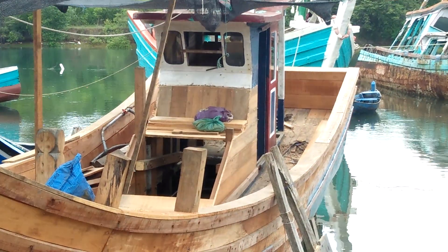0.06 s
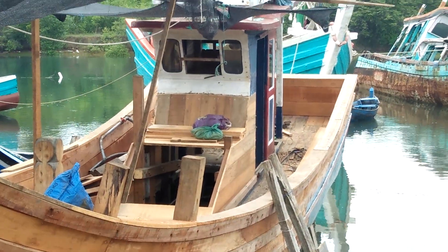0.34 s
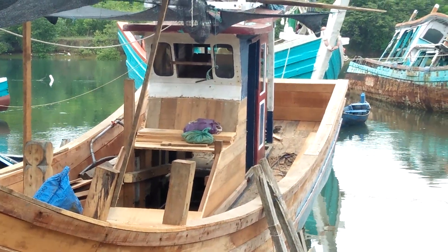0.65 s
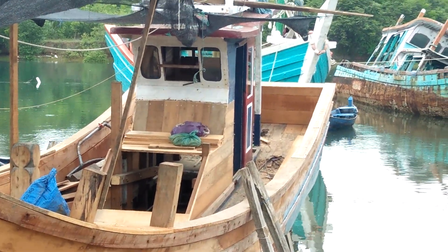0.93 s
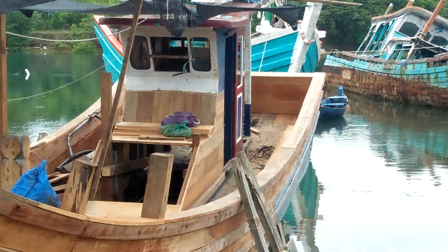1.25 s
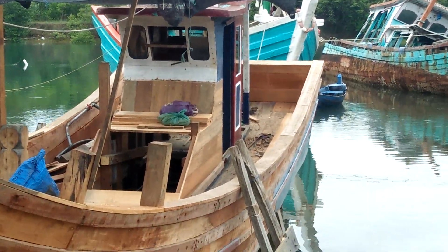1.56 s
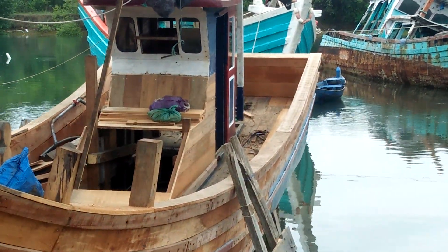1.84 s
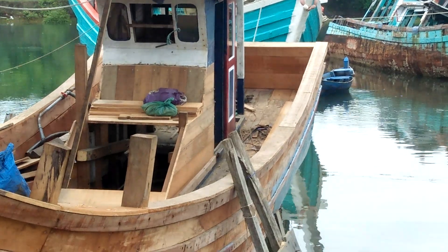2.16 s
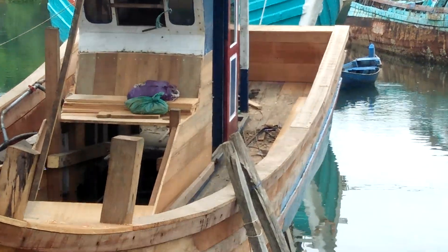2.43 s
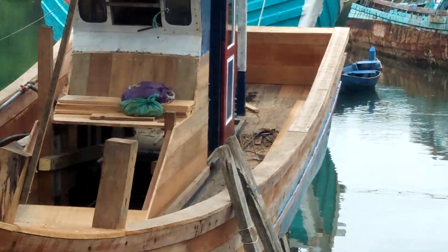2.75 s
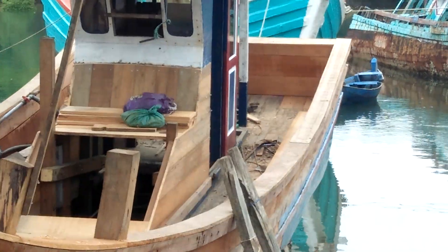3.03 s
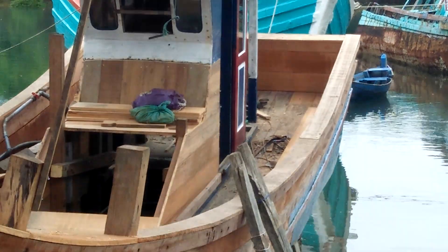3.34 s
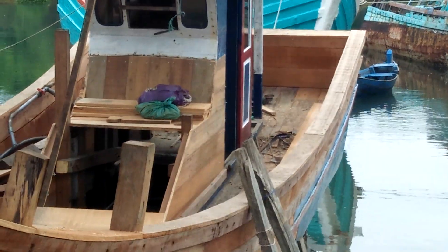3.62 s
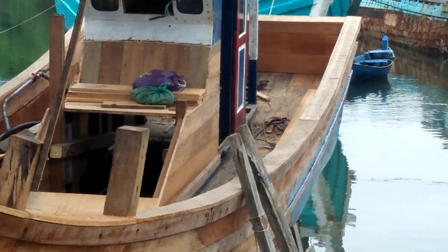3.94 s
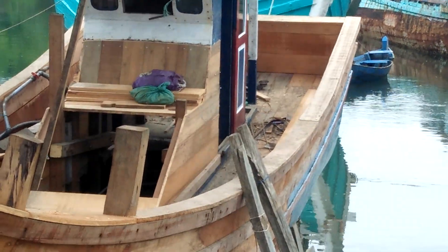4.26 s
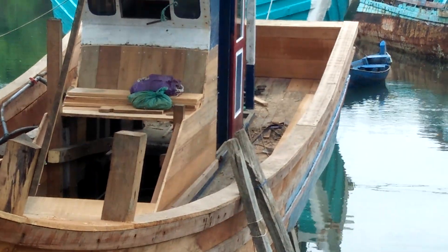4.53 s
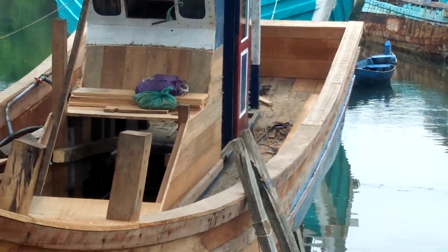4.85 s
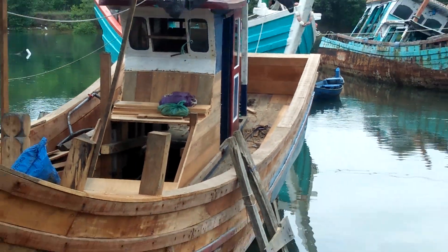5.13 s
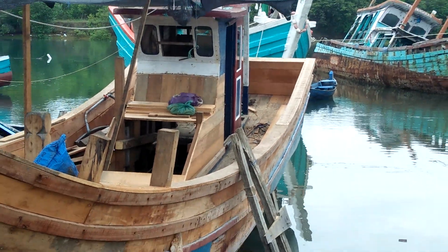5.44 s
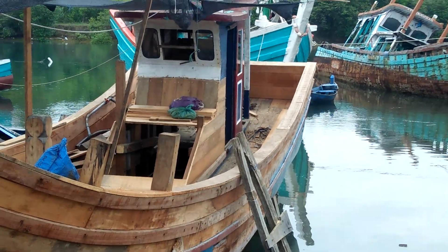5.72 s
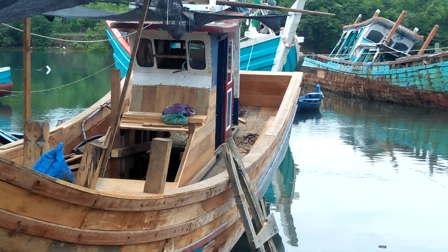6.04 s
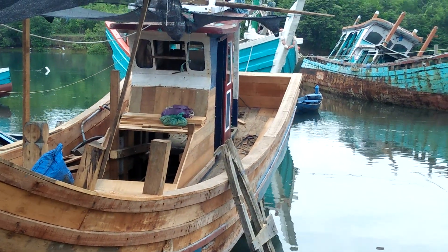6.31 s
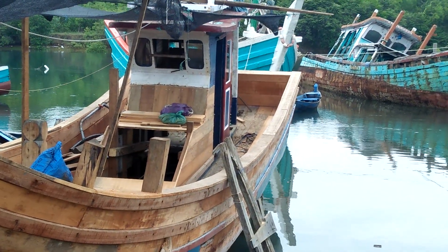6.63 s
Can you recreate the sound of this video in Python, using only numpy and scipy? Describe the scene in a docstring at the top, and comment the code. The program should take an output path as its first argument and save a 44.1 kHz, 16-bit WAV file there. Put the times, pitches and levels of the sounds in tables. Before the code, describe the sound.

Across the water of a harbour, a diesel boat engine throbs rapidly over a fainter idling one and a distant rumble. Right by the microphone come a dull, dry double knock and then a small click, the sharpest sounds heard. Afterwards the engine picks up for a moment and eases back, while water sloshes, splashes and gurgles among the moored boats under a light hiss.

```python
"""A single-cylinder boat diesel thuds across the harbour, speeding up briefly, over a second one idling.
Each firing sends a pulse and a puff of gas down the exhaust pipe. Water washes between the moored
hulls in rough swells, trapped air gurgles, and spray lays a fine hiss on top.
Close to the microphone come one dull double knock and a small sharp click."""
import sys
import numpy as np
from scipy import signal
from scipy.fft import rfft, irfft, next_fast_len
from scipy.io import wavfile
from scipy.ndimage import uniform_filter1d, map_coordinates

SR = 44100
rng = np.random.default_rng(int(sys.argv[2]) if len(sys.argv) > 2 else 0)


def generate_wav(signal):
    """Clip the signal to [-1, 1] and save it as 16-bit WAV at the path in sys.argv[1]."""
    frames = np.transpose(np.atleast_2d(signal))
    scaled = np.clip(frames, -1, 1) * 32767
    pcm = np.round(scaled).astype(np.int16)
    wavfile.write(sys.argv[1], SR, pcm)


N = 303496
T = np.arange(N) / SR
SLOW_T = np.arange(0, N, 100) / SR  # coarse clock for the swells

# The running diesel, across the water.
ENGINE_SPEED = [(0, 32.3), (.25, 32.1), (.5, 31.4), (.8, 30), (1, 29.55), (1.3, 29.35), (1.6, 30.2),
                (2, 32.4), (2.45, 34.1), (2.9, 31.9), (3.3, 31.4), (4, 30.7), (4.5, 30.3), (5, 30.05),
                (6, 29.9), (6.88, 29.4)]  # time_s, firings_per_s
EXHAUST_LEVELS = [(0, -49.5, -55.5), (.5, -49, -57), (.88, -45.5, -61.5), (1.3, -49.5, -78),
                  (1.42, -55.5, -66), (2.8, -56, -63), (2.98, -49, -65), (3.2, -51.5, -58),
                  (3.5, -53.5, -50), (3.88, -46.5, -48), (4.4, -47, -57), (4.6, -52, -69),
                  (4.8, -52.5, -62), (5.2, -54.5, -68), (5.6, -54, -62.5), (6.4, -73, -60),
                  (6.88, -55.5, -65)]  # time_s, thud_db, bark_db
BOOM_LEVELS = [(0, -45.5, -51), (.13, -41.5, -57), (.43, -48, -52), (.85, -54, -77), (1.3, -69, -79.5),
               (1.76, -46.5, -54), (2, -59, -74), (2.6, -63, -65), (3.05, -49, -58), (3.6, -45.5, -54.5),
               (4.4, -53.5, -61.5), (6.5, -55, -53), (6.88, -57, -59)]  # low exhaust tones: time_s, second_order_db, third_order_db
DRONE_LEVELS = [(0, -67.5), (1.3, -65.5), (1.7, -63), (2.8, -83), (3.25, -70.5), (3.6, -56.5), (4, -55),
                (4.55, -63), (4.78, -57), (5, -70.5), (6.88, -62.5)]  # the pipe's upper resonance: time_s, level_db
# Exhaust resonances, low to high: frequency_hz, gain_db
THUD_SPECTRUM = [(60, -56), (92, -8.5), (122, -5), (155, 6), (185, 4.5), (220, -3.5), (300, -34),
                 (400, -58), (1500, -110)]
BARK_SPECTRUM = [(150, -51.5), (240, -6.5), (295, 3), (335, 0), (400, -12.5), (530, -30), (760, -44),
                 (1200, -57), (4000, -100)]
DRONE_SPECTRUM = [(330, -49), (420, -4.5), (465, 3), (495, -1), (535, -21.5), (610, -6.5), (700, -35.5),
                  (2000, -92.5)]
IDLE_ORDERS = [(2, -65), (3, -61), (4, -59.5), (5, -66), (6, -65)]  # the second diesel, farther off: order, level_db

# Swells between the moored hulls: crest_s, rise_s, fall_s, level_db, pitch_hz, hollow_relative_db
LOW_SLOSHES = [(.05, 0.43, 1, -52.5, 720, -12), (.6, 0.18, 0.46, -53.5, 840, -4),
               (1.25, 0.16, 0.15, -55.5, 824, -6), (3.1, 0.11, 0.12, -51.5, 1340, 1),
               (3.28, 0.13, 0.14, -51.5, 1110, 3), (3.8, 0.2, 0.24, -44.5, 855, -9.5),
               (3.98, 0.11, 0.29, -44, 950, -32), (4.19, 0.061, 0.13, -45, 1090, -4),
               (4.38, 0.39, 0.37, -47, 830, -32), (4.849, 0.17, 0.24, -48, 1150, 3.5),
               (5.3, 0.27, 0.19, -56.5, 850, -20), (5.64, 0.25, 0.92, -53, 1015, -15),
               (6.1, 0.18, 0.39, -57.5, 780, -27), (6.47, .1, 0.16, -55.5, 830, -25),
               (6.66, 0.21, 0.19, -51, 860, -14)]
BRIGHT_SPLASHES = [(.52, 0.36, 0.7, -55.5, 1890, -10), (1.75, 0.22, 0.3, -47.5, 2080, -13),
                   (2.08, 0.33, 0.19, -46, 1990, -12), (2.41, 0.3, 0.22, -45, 1770, -3),
                   (2.55, 0.081, 0.18, -47, 1650, 0.5), (2.7, 0.2, 0.11, -54.5, 2420, -16),
                   (3.1, 0.33, 1, -58.5, 1990, 1), (3.5, 0.082, 0.056, -47.5, 1990, -20),
                   (3.57, 0.1, 0.13, -50.5, 2010, 9), (4.1, 0.92, 0.078, -57.5, 1850, -15),
                   (4.33, 0.11, 0.08, -54.5, 2480, -15), (4.59, 0.15, 0.3, -53, 2310, -10),
                   (4.87, 0.09, 0.18, -53, 1860, -3), (5.02, 0.1, 0.12, -50, 2310, -13),
                   (5.48, 0.23, 0.17, -55.5, 1750, -4), (5.68, 0.1, 0.08, -53.5, 1720, -6),
                   (6.03, 0.34, 0.35, -58, 1800, -21), (6.62, 0.13, 0.2, -72.5, 1990, -18)]
# Colour of the water and of the hollow between hulls: frequency_hz, gain_db
SLOSH_SPECTRUM = [(300, -47), (480, -4.5), (620, 1.5), (780, -1.5), (900, 2), (1030, 1), (1280, 0.5),
                  (1600, -25), (3000, -46), (8000, -84)]
SPLASH_SPECTRUM = [(1050, -4.5), (1500, 1), (1750, 1), (2150, 3), (2550, 6), (2950, -0.5), (3500, -41),
                   (6000, -29), (12000, -73)]
HOLLOW_SPECTRUM = [(800, -37), (1100, -8), (1330, 2), (1420, 11), (1480, 11.5), (1580, -4.5), (1750, 2.5),
                   (2100, -52), (6000, -83)]
CLOSING_GAPS = [(1.8, 0.28, 948, -62.5), (2.06, 0.14, 2150, -49), (2.635, 0.094, 940, -58),
                (3.42, .06, 822, -55.5), (4.225, 0.029, 1465, -48.5), (4.545, 0.066, 1780, -55)]  # ringing gaps between hulls: crest_s, spread_s, pitch_hz, level_db
AIR_POCKETS = [(1.939, -33, 2080), (2.101, -30, 2170), (2.519, -30, 1740), (3.9255, -28.5, 910),
               (3.9745, -26.5, 933), (4.0425, -28.5, 1030), (4.1175, -30.5, 1070), (4.2705, -32, 1000),
               (4.358, -34.5, 920), (4.4675, -33, 915), (4.834, -32, 1420), (4.9, -33.5, 1410),
               (6.07, -42, 817), (6.198, -43, 775), (6.436, -42.5, 754), (6.731, -41, 720)]  # gurgles: start_s, peak_db, pitch_hz

# Knocks, close to the microphone.
KNOCK_PUSHES = [(0.7886, -11, 161, 0.005), (0.7907, -4.8, 307, 0.00165), (0.79525, -14.5, 601, 0.0025),
                (0.7968, -12, 750, 0.0005), (0.7979, -2.5, 560, 0.00065), (0.798, -30.5, 81, 0.009),
                (1.1807, -23, 1000, 0.00058)]  # start_s, level_db, pitch_hz, rise_s
HARD_CONTACTS = [(0.797, -4, 9200), (1.181, -9.5, 13900)]  # start_s, level_db, cutoff_hz
CRACK_SPECTRUM = [(1000, -25), (1650, -2), (2150, -24), (2750, 2.5), (3300, -2), (4000, -28), (4600, -15),
                  (5200, -30), (6200, -6), (7500, 2.5), (11500, -2.5), (14000, 1)]  # colour of a hard contact: frequency_hz, gain_db

# Fine treble on top of the water, and a few thin whistles.
SPRAY_BURSTS = [(.35, 0.25, 0.48, -58.5, -65), (.85, 0.1, 0.11, -60.5, -65),
                (1.24, 0.068, 0.11, -60.5, -61), (1.6, 0.28, 0.3, -59, -61.5),
                (2, 0.61, 0.29, -61.5, -61.5), (2.8, 0.12, 0.26, -65.5, -61.5),
                (3.029, 0.048, 0.11, -64.5, -64), (3.37, 0.022, 0.46, -60, -72),
                (3.78, 0.22, 0.21, -58.5, -67), (4.18, 0.45, 0.29, -61.5, -73),
                (4.68, 0.066, 0.19, -70, -86.5), (4.96, 0.14, 0.13, -65, -77), (5.46, 0.24, 0.35, -70, -81)]  # crest_s, rise_s, fall_s, hiss_db, sizzle_db
CALM_SPRAY = [(0, -74, -76), (1.1, -69, -89), (2.55, -67, -71), (3.3, -71, -77), (4.5, -81, -90),
              (6.001, -97, -98), (6.88, -94, -102)]  # between the bursts: time_s, hiss_db, sizzle_db
RUSTLE_SWELLS = [(.42, 0.69, 0.76, -66.5, 3360), (1.9, 0.49, 0.57, -61, 3860),
                 (2.48, 0.33, 0.61, -59.5, 3630), (3.08, 0.16, 0.24, -58, 2900),
                 (3.58, 0.34, 0.16, -58.5, 3330), (4.03, 0.38, 0.39, -61, 4970),
                 (4.6, 0.039, 0.066, -74, 2930), (4.88, 0.42, 0.26, -67, 3950),
                 (5.55, 0.74, 0.22, -78.5, 5800), (5.68, 0.29, .25, -75.5, 3560),
                 (6.16, 0.083, 0.15, -65, 3380)]  # crest_s, rise_s, fall_s, level_db, pitch_hz
THIN_WHISTLES = [(.37, .12, 5680, -68), (.29, .16, 7900, -63), (3.04, .045, 7450, -66),
                 (3.41, .035, 8000, -66), (4.65, .04, 6750, -72), (4.95, .025, 6350, -68),
                 (6.17, .08, 5520, -71), (6.42, .15, 5560, -86)]  # crest_s, spread_s, pitch_hz, level_db
SCRATCHY_TICKS = [(2.037, -51.5, 4030), (2.099, -50, 3890), (2.191, -50, 3900), (2.374, -47, 3720),
                  (2.55, -54, 3830), (2.611, -52, 3920), (4.048, -53, 3600), (4.275, -55, 3500)]  # start_s, ping_db, pitch_hz
# Colour of the spray's layers: frequency_hz, gain_db
HISS_SPECTRUM = [(3500, -10), (4900, -5.5), (5600, -3.5), (6800, 3.5), (8000, 5), (9500, 1.5), (11000, -9),
                 (14000, -24)]
SIZZLE_SPECTRUM = [(6000, -30), (9000, -6), (11000, 0), (12500, -1), (14200, -1.5)]
RUSTLE_SPECTRUM = [(1800, -5), (2900, 6), (3400, -4.5), (4000, -5.5), (4900, -3), (5600, -3.5), (8000, -16),
                   (14000, -55)]

# The far harbour, and the microphone.
RUMBLE_LEVELS = [(0, -59), (.7, -56), (.95, -62), (1.3, -60.5), (1.45, -54), (1.8, -52.5), (2.5, -55),
                 (3.4, -60), (4.4, -59.5), (5.2, -67), (5.5, -55), (6.88, -55)]  # time_s, level_db
RUMBLE_SPECTRUM = [(25, -12), (45, -19), (90, -4.5), (130, 3.5), (220, 0), (310, 0.5), (450, -11),
                   (600, -20), (1500, -75)]  # frequency_hz, gain_db
AMBIENCE_SPECTRUM = [(15, -7), (35, -23), (60, -5.5), (120, -13), (220, -22), (320, -18.5), (450, -27.5),
                     (1000, -20.5), (2700, -29.5), (3800, -47), (14000, -55.5)]  # steady distant noise: frequency_hz, gain_db
STEREO_LIKENESS = [(3200, 1), (5000, 1), (7000, 0.62), (14000, 0.51)]  # left against right: frequency_hz, correlation
MICROPHONE_RESPONSE = [(15, -19), (40, 3.5), (345, -2), (375, -9), (405, 2), (14000, -2.5)]  # frequency_hz, gain_db


def diesel(turns):
    """Across the water each firing thuds, barks and drones in the pipe, over a slowly beating boom."""
    thud_db, bark_db = curves(EXHAUST_LEVELS)
    second_db, third_db = curves(BOOM_LEVELS)
    drone_db, = curves(DRONE_LEVELS)
    pulses = hull_echoes(firings(turns, scatter_db=2, jitter_s=.00012))
    beat_db = 3.5 * np.cos(2 * np.pi * (turns - 5.1) / 7.15)  # one beat every 7.15 firings
    surge = unit(amp(beat_db + 2 * wobble(13)))
    tone = lambda order: unit(np.sin(2 * np.pi * order * turns))
    boom = surge * (amp(second_db) * tone(order=2) + amp(third_db) * tone(order=3))
    thud = amp(thud_db) * unit(ring(pulses, THUD_SPECTRUM))
    puffs = unit(throb(turns, depth=.52) * rng.standard_normal(N))
    gas = unit(pulses) + .55 * puffs
    bark = amp(bark_db) * unit(ring(gas, BARK_SPECTRUM))
    drone = amp(drone_db) * unit(ring(gas, DRONE_SPECTRUM))
    return boom + thud + bark + drone


def firings(turns, scatter_db, jitter_s):
    """The cylinder fires once per whole turn, uneven in strength and timing."""
    at = np.flatnonzero(np.diff(np.floor(turns)) > 0)
    lateness, strength = rng.standard_normal((len(at), 2)).T
    at = np.clip(at + jitter_s * SR * lateness, 0, N - 1).astype(int)
    return np.bincount(at, amp(scatter_db * strength), N)


def throb(turns, depth):
    """A gain of rms 1 that crests just after each firing."""
    return unit(np.exp(depth * np.cos(2 * np.pi * (turns - .2))))


def idling_diesel():
    """Farther off a slower diesel drones, its pulses smeared into wavering orders."""
    firings_per_s = 22.35 * (1 + .003 * wobble(1.5))
    turns = np.cumsum(firings_per_s) / SR
    out = np.zeros(N)
    for order, db in IDLE_ORDERS:
        waver = amp(3 * wobble(4))
        out += amp(db) * unit(waver * np.sin(2 * np.pi * (order * turns + rng.random())))
    return out


def wash(turns):
    """Water sloshes, splashes and rings hollow between the hulls; the engine flutters it."""
    slosh_gain, slosh_hz = swells(LOW_SLOSHES, calm_db=-66.5, sag_octaves_per_s=.52)
    splash_gain, splash_hz = swells(BRIGHT_SPLASHES, calm_db=-68.5, sag_octaves_per_s=.31)
    hollow_power = sum((amp(db + hollow_db) * swell(crest, rise, fall)) ** 2
                       for crest, rise, fall, db, _, hollow_db in LOW_SLOSHES + BRIGHT_SPLASHES)
    slosh = shifting_echoes(swept_noise(SLOSH_SPECTRUM, slosh_hz, width=.23, grit_db=1.65), strength=.25)
    hollow = rippled(hollow_power) * noise(HOLLOW_SPECTRUM)
    splash = shifting_echoes(swept_noise(SPLASH_SPECTRUM, splash_hz, width=.11, grit_db=3), strength=.18)
    return (slosh_gain * slosh + hollow + splash_gain * splash) * throb(turns, depth=.13)


def swells(rows, calm_db, sag_octaves_per_s):
    """Gain and pitch of overlapping swells over calm water; the strongest leads the sagging pitch."""
    power = amp(calm_db) ** 2
    weighted_hz = power * np.mean([row[4] for row in rows])
    for crest, rise, fall, db, hz, *_ in rows:
        swell_power = (amp(db) * swell(crest, rise, fall)) ** 2
        power = power + swell_power
        weighted_hz = weighted_hz + swell_power * hz * np.exp2(-sag_octaves_per_s * (SLOW_T - crest))
    return rippled(power), np.interp(T, SLOW_T, weighted_hz / power)


def swell(crest_s, rise_s, fall_s):
    """One swell builds to 1 and ebbs, on the coarse clock."""
    t = SLOW_T - crest_s
    return np.exp(-np.abs(t / np.where(t < 0, rise_s, fall_s)) ** 1.48)  # exponent: 1 pointed, 2 round


def rippled(power, depth_db=1):
    """Small waves ride on a swell; turns its power into a gain per sample."""
    return np.interp(T, SLOW_T, np.sqrt(power)) * amp(depth_db * wobble(11))


def gap_rings():
    """Each gap between hulls rings on its own hollow note as the water closes it."""
    return sum(amp(db) * raspy_note(crest, spread, hz, width_hz=.035 * hz)
               for crest, spread, hz, db in CLOSING_GAPS)


def gurgles():
    """Short-lived air pockets ring in the swells."""
    out = np.zeros(N)
    t = T[:SR // 20]
    for start, db, hz in AIR_POCKETS:
        out[round(start * SR):][:len(t)] += amp(db) * ping(t, hz, rise_s=.0021, steepness=2)
    return out


def knocks():
    """Close to the microphone, each knock is a heavily damped push; hard contacts add a tiny crack."""
    out = np.zeros(N)
    t = T[:SR // 8]
    for start, db, hz, rise in KNOCK_PUSHES:
        out[round(start * SR):][:len(t)] -= amp(db) * ping(t, hz, rise, steepness=2)
    for start, db, cutoff_hz in HARD_CONTACTS:
        crack = ring(signal.unit_impulse(N, round(start * SR)), CRACK_SPECTRUM)
        out += amp(db) * filtered(crack, lambda hz: 1 / (1 + (hz / cutoff_hz) ** 8))
    return out


def spray(turns):
    """Spray hisses and sizzles in bursts, with droplets and gritty rustles; a few thin whistles sound high
    above."""
    times, *calm_db = np.transpose(CALM_SPRAY)
    power = amp([np.interp(SLOW_T, times, db) for db in calm_db]) ** 2
    for crest, rise, fall, hiss_db, sizzle_db in SPRAY_BURSTS:
        power += (amp([[hiss_db], [sizzle_db]]) * swell(crest, rise, fall)) ** 2
    rustle_gain, rustle_hz = swells(RUSTLE_SWELLS, calm_db=-81.5, sag_octaves_per_s=.15)
    hiss = rippled(power[0]) * (patchy(stereo_noise(HISS_SPECTRUM)) + droplets())
    sizzle = rippled(power[1]) * patchy(stereo_noise(SIZZLE_SPECTRUM))
    out = (hiss + sizzle) * amp(1.5 * wobble(110))
    rustle = swept_noise(RUSTLE_SPECTRUM, rustle_hz, width=.22, grit_db=3)
    out += rustle_gain * shifting_echoes(rustle, strength=.079)
    for crest, spread, hz, db in THIN_WHISTLES:
        out += amp(db) * raspy_note(crest, spread, hz, width_hz=300)
    return out * throb(turns, depth=.064)


def droplets(per_s=22, low_hz=5500, high_hz=11500):
    """Tiny drops ping at random, a few of them louder."""
    out = np.zeros(N + SR)
    t = T[:SR // 100]
    for when, pitch, size in rng.random((round(per_s * N / SR), 3)):
        drop = ping(t, low_hz + pitch * (high_hz - low_hz), rise_s=.0006)
        out[int(when * N):][:len(t)] += amp(7) * (.5 + size ** 2) * drop
    return out[:N]


def ticks(pings=4):
    """Each scratchy tick is a tight cluster of tiny pings."""
    out = np.zeros(N)
    t = T[:SR // 100]
    for start, db, hz in SCRATCHY_TICKS:
        for lag_s, detune in zip(rng.uniform(0, .005, pings), rng.normal(1, .06, pings)):
            out[round((start + lag_s) * SR):][:len(t)] += amp(db) * ping(t, hz * detune, rise_s=.0004)
    return out


def rumble():
    """Far across the harbour a lumpy low rumble comes and goes."""
    level_db, = curves(RUMBLE_LEVELS)
    lumps = unit(amp(2.5 * wobble(9) + 2 * wobble(45)))
    return amp(level_db) * lumps * noise(RUMBLE_SPECTRUM)


def hull_echoes(x, round_trip_s=.0125, strength=.22):
    """Repeated echoes between the hulls spread each pulse in time and keep its colour."""
    trip = lambda hz: np.exp(-2j * np.pi * hz * round_trip_s)
    return filtered(x, lambda hz: (1 + strength / trip(hz)) / (1 + strength * trip(hz)))


def shifting_echoes(x, strength):
    """Slowly shifting echoes between hulls and water make a sound hollow; rms 1."""
    delays_s = rng.uniform(.003, .012, 4)
    echoes = [np.interp(T - delay - .00012 * wobble(1.5), T, x) for delay in delays_s]
    return unit(x + strength * sum(echoes))


def hull_reflection(x, delay_s, level_db, cutoff_hz):
    """A nearby hull returns a dull copy that combs the low notes."""
    dull_delay = lambda hz: np.exp(-2j * np.pi * hz * delay_s) / (1 + (hz / cutoff_hz) ** 4)
    return amp(level_db) * filtered(x, dull_delay)


def ping(t, hz, rise_s, steepness=1):
    """A damped tone whose envelope reaches 1 at rise_s."""
    age = t / rise_s
    return (age * np.exp(1 - age)) ** steepness * np.sin(2 * np.pi * hz * t)


def raspy_note(crest_s, spread_s, hz, width_hz):
    """A rough note of narrow noise that swells and fades."""
    band = unit(filtered(rng.standard_normal(N), lambda f: 1 / (1 + ((f - hz) / width_hz) ** 2)))
    rasp = amp(3.5 * wobble(70))
    return rasp * np.exp(-.5 * ((T - crest_s) / spread_s) ** 2) * band


def swept_noise(spectrum, centre_hz, width, grit_db):
    """Grainy noise of rms 1 through a moving resonance; width is a share of its pitch."""
    grains = rng.standard_normal(N) * amp(grit_db * wobble(350))
    hz, t, frames = signal.stft(grains, SR, nperseg=1024)
    detuning = (hz[:, None] / np.interp(t, T, centre_hz) - 1) / width
    gain = amp(along(spectrum, hz))[:, None] / (1 + detuning ** 2) ** .65
    gain /= np.linalg.norm(gain, axis=0)
    return unit(signal.istft(frames * gain, SR, nperseg=1024)[1][:N])


def patchy(x, depth_db=1.8, width_hz=700, length_s=.08):
    """A stereo sound flutters in patches of random gain; rms 1."""
    hz, t, frames = signal.stft(x, SR, nperseg=512)
    patches = uniform_filter1d(rng.standard_normal(frames.shape[1:]), round(width_hz / hz[1]), axis=0)
    patches = uniform_filter1d(patches, round(length_s / t[1]))
    return unit(signal.istft(frames * amp(depth_db * unit(patches)), SR)[1][:, :N])


def stereo_noise(spectrum):
    """Coloured noise whose treble differs between left and right."""
    def side_gain(hz):
        likeness = along(STEREO_LIKENESS, hz)
        return np.sqrt(np.clip((1 - likeness) / (1 + likeness), 0, 1))
    mid, side = noise(spectrum), filtered(noise(spectrum), side_gain)
    return np.array([mid + side, mid - side])


def noise(spectrum):
    """Coloured noise of rms 1."""
    return unit(filtered(rng.standard_normal(N), lambda hz: amp(along(spectrum, hz))))


def ring(x, spectrum, size=16384):
    """x through a resonant body with the given spectrum."""
    cepstrum = irfft(np.log(amp(along(spectrum, np.fft.rfftfreq(size, 1 / SR)))))
    cepstrum[1:size // 2] *= 2  # minimum phase: the body rings only after it is struck
    cepstrum[size // 2 + 1:] = 0
    return signal.fftconvolve(x, irfft(np.exp(rfft(cepstrum))))[:N]


def filtered(x, response):
    """x through a response given as a function of frequency."""
    size = next_fast_len(N + SR // 2)
    return irfft(rfft(x, size) * response(np.fft.rfftfreq(size, 1 / SR)), size)[..., :N]


def wobble(knots_per_s):
    """A smooth random curve."""
    knots = rng.standard_normal(int(N * knots_per_s / SR) + 4)
    coarse = T[::16]
    return np.interp(T, coarse, map_coordinates(knots, [coarse * knots_per_s]))


def curves(rows):
    """One value per sample for each column after the time."""
    times, *columns = np.transpose(rows)
    return [np.interp(T, times, column) for column in columns]


def along(points, hz):
    """Read (frequency_hz, value) points on a log frequency axis."""
    frequencies, values = np.transpose(points)
    return np.interp(np.log(hz + 1), np.log(frequencies + 1), values)


def amp(db):
    return 10 ** (np.asarray(db) / 20)


def unit(x):
    return x / np.sqrt(np.mean(x ** 2) + 1e-20)


def scene():
    """Engines, water and the far harbour arrive with a nearby hull's echo; the close knocks stay dry."""
    turns = .2926 + np.cumsum(curves(ENGINE_SPEED)[0]) / SR  # one turn per firing
    harbour = diesel(turns) + idling_diesel() + rumble()
    harbour = harbour + wash(turns) + gap_rings() + gurgles() + spray(turns) + ticks()
    harbour += amp(-57.5) * stereo_noise(AMBIENCE_SPECTRUM)
    return harbour + hull_reflection(harbour, delay_s=.006796, level_db=-10.5, cutoff_hz=910) + knocks()


def record(dry, top_hz=14300):
    """The microphone has a narrow dip in the low mids and a hard band limit."""
    coloured = np.array([ring(channel, MICROPHONE_RESPONSE) for channel in dry])
    return filtered(coloured, lambda hz: hz < top_hz)


dry = scene()
out = record(dry)
generate_wav(out)
```